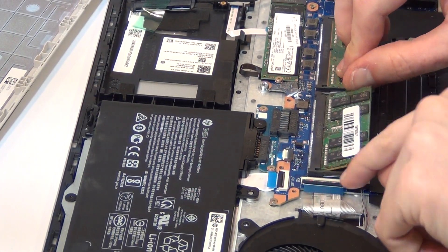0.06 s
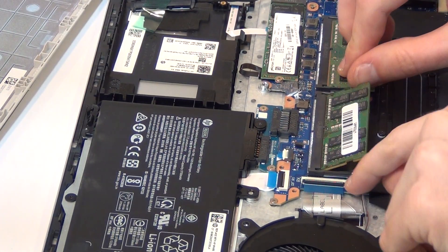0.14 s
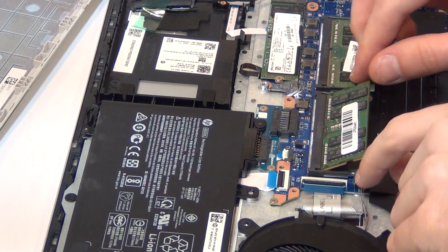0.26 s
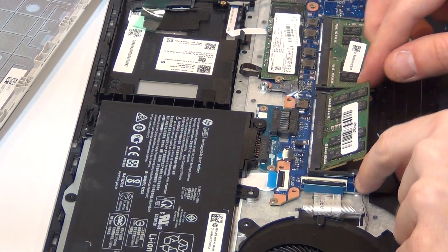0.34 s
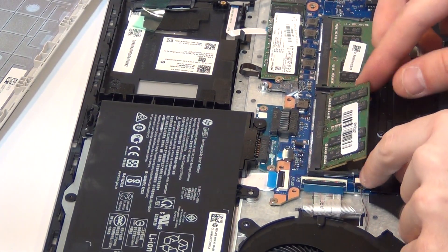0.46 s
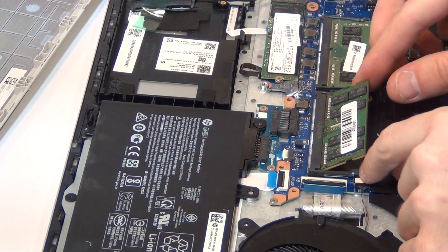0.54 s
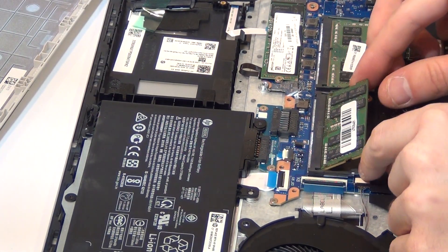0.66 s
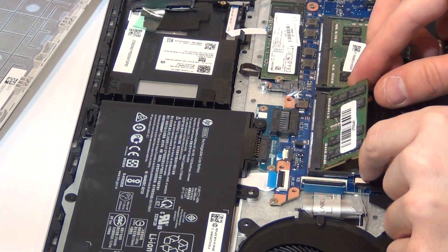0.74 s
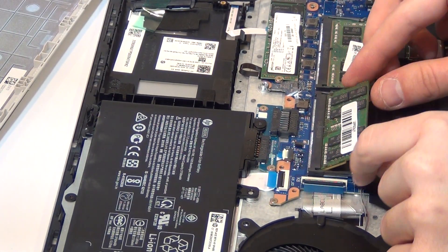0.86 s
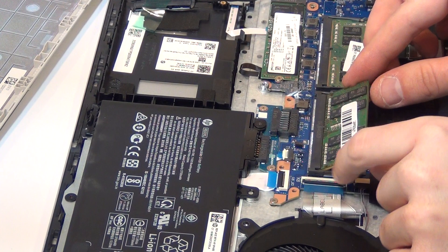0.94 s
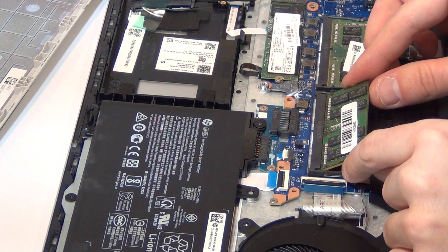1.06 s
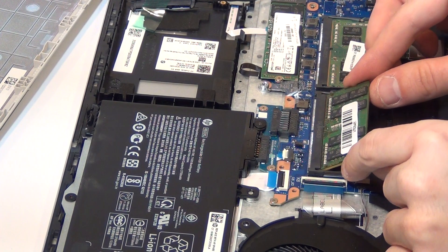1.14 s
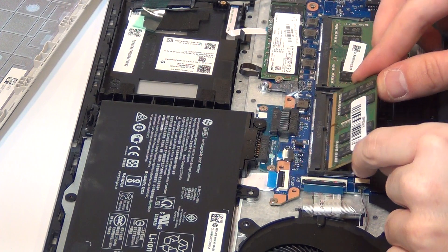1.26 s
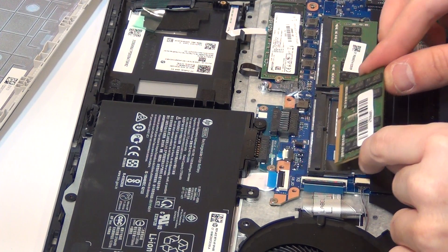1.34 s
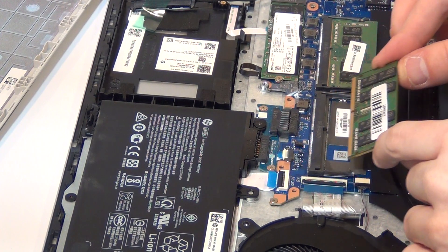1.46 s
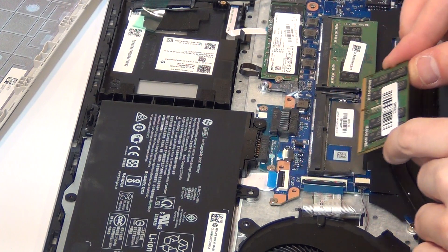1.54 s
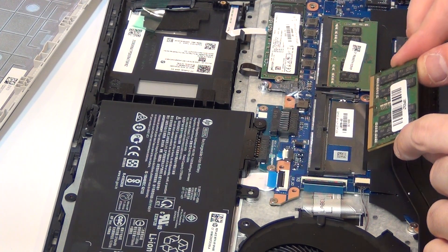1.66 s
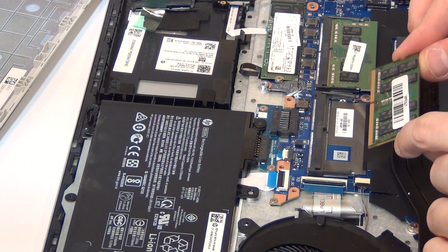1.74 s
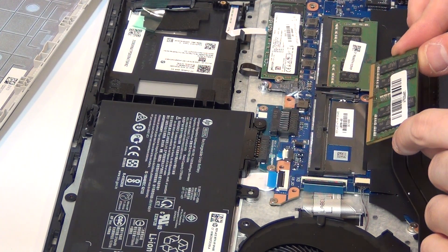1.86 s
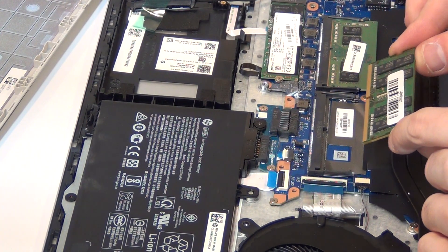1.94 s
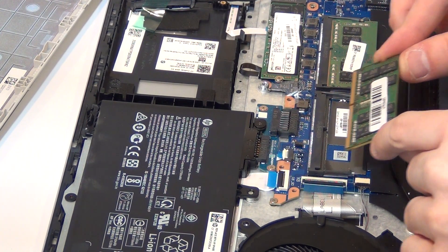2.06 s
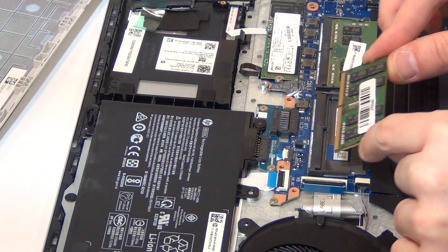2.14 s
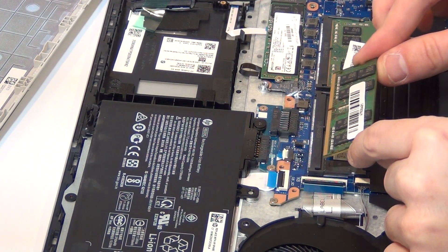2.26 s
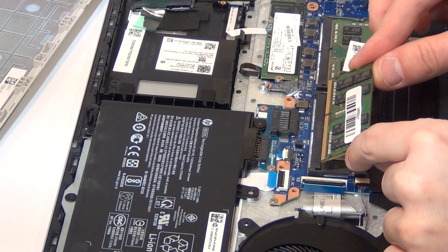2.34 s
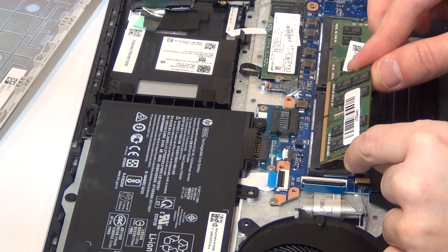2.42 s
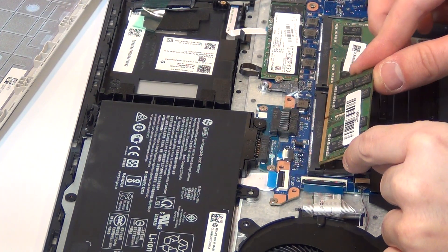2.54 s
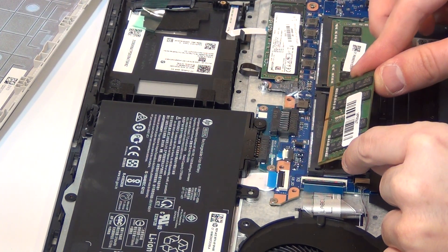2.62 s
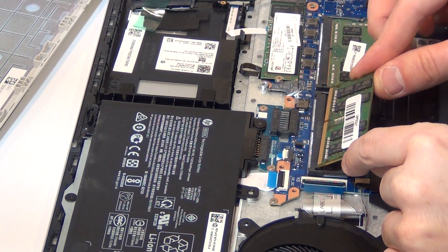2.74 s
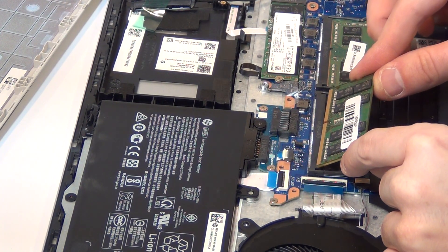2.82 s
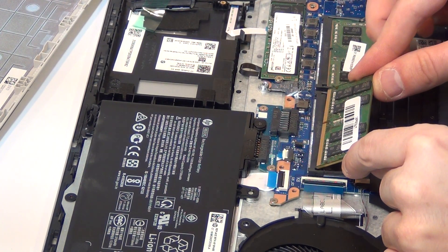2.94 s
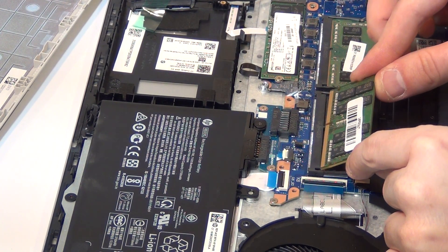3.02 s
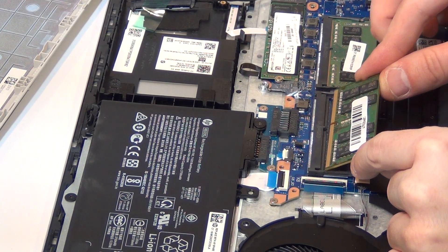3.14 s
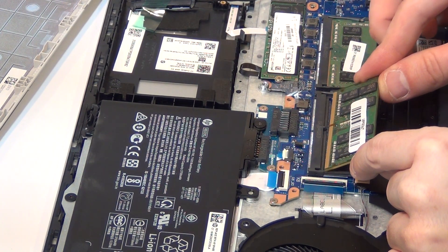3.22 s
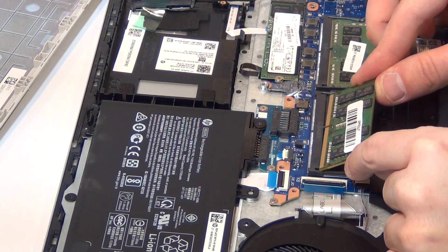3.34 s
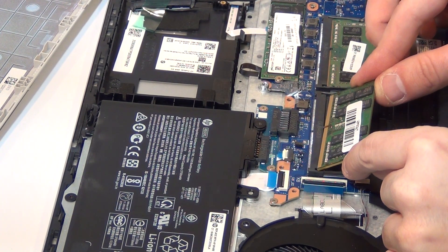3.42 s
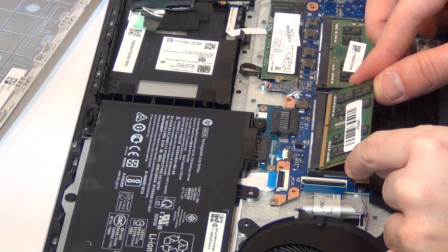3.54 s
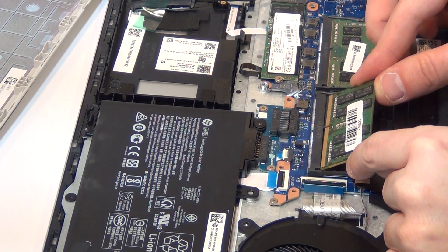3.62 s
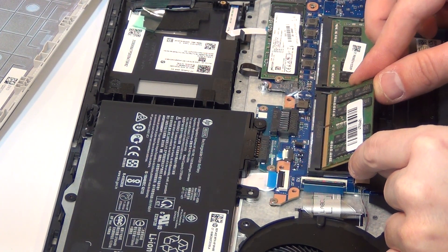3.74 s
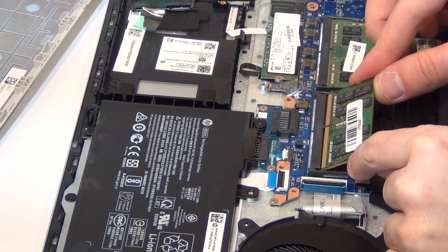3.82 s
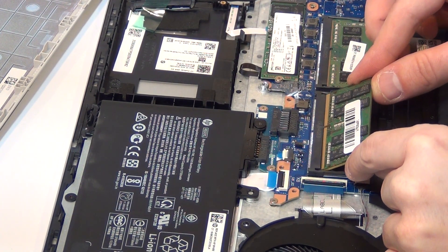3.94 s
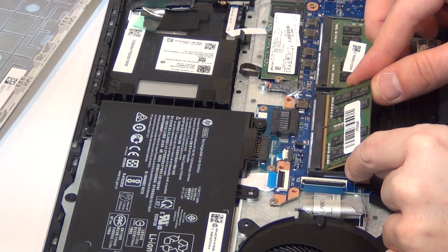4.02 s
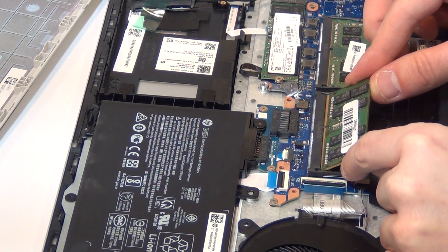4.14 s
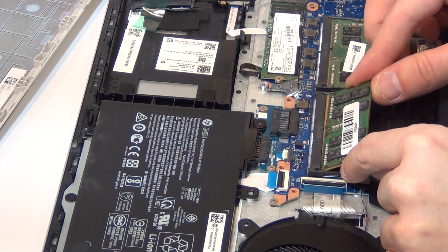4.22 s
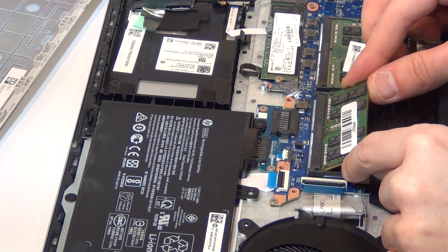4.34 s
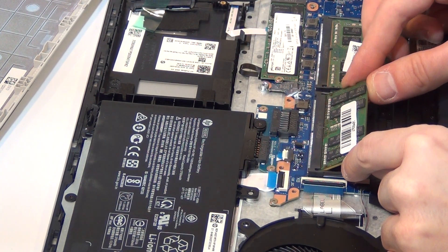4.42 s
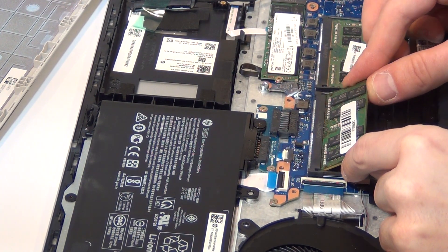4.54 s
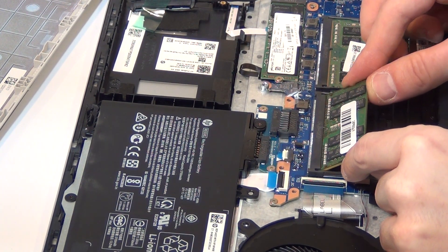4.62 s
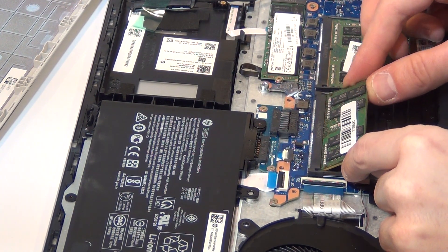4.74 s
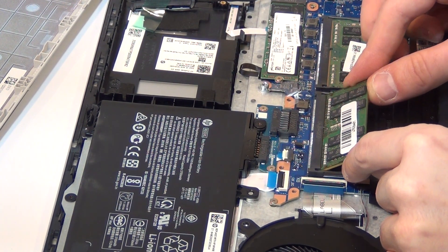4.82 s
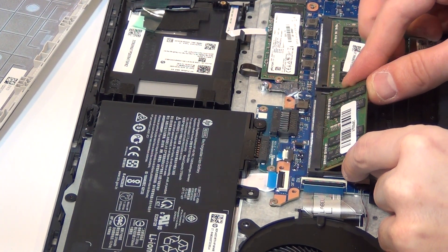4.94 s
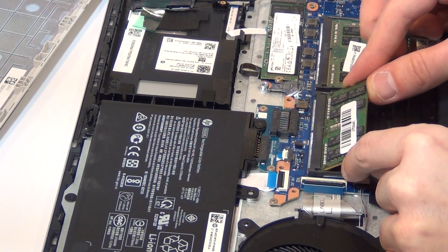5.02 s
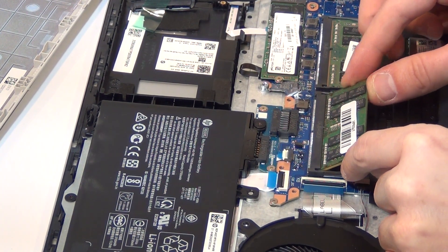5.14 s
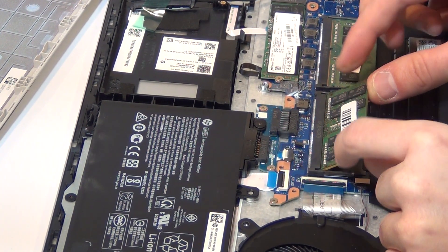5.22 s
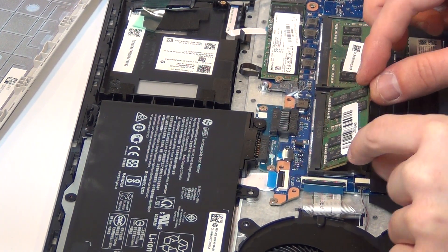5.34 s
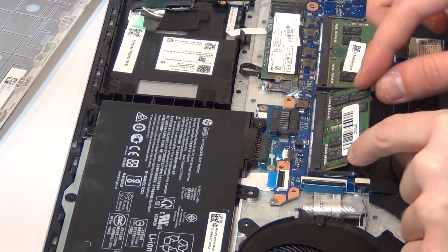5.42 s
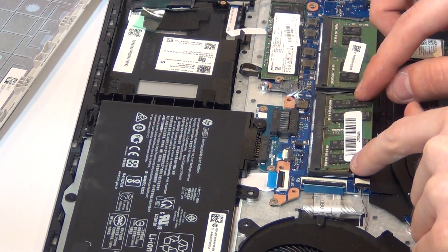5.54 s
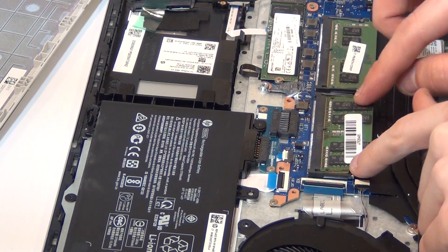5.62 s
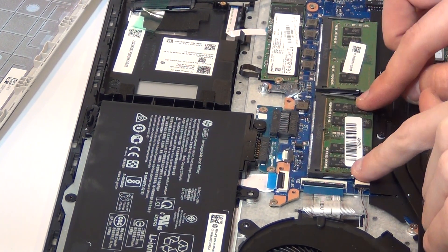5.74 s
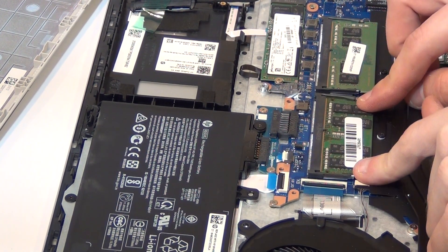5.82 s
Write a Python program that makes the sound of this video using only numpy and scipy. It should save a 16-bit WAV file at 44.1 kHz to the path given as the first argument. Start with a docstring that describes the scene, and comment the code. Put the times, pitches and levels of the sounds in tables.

```python
"""A small room, an open laptop: a memory module is fumbled into its slot. Enveloped noise scrapes, and narrow
noise bands give hoarse drag tones and a rattly wash after the second knock; struck modes tick against the
socket and seat with two knocks. Pressed flat, the module makes the latches creak in small slips, then two steel
latches snap over it. The shell rings and the room answers as fading noise. Low rumble, mains hum, microphone
hiss and a faint high whine lie beneath, all nearly mono."""
import sys
import numpy as np
from scipy import signal
from scipy.fft import rfft, irfft, next_fast_len
from scipy.io import wavfile
from scipy.ndimage import uniform_filter1d, map_coordinates

SR = 44100
rng = np.random.default_rng(int(sys.argv[2]) if len(sys.argv) > 2 else 0)


def unload_audio(sound):
    """Save the sound as a 16-bit wav file, at the path given as the first command line argument."""
    columns = np.transpose(np.atleast_2d(sound))
    # keep every value between -1 and 1, then stretch to whole-number steps
    steps = np.round(np.clip(columns, -1, 1) * 32767)
    wavfile.write(sys.argv[1], SR, steps.astype(np.int16))


N = 258867

# Steady rumble and air, relative density: f/Hz, level/dB per Hz
RUMBLE_SPECTRUM = [(5, -0.5), (14, 8.5), (35, -1), (45, -16), (56, 7.5), (68, 5), (82, -5.5), (120, -4),
                   (170, -8.5), (260, -35)]
AIR_SPECTRUM = [(100, -44), (180, -0.5), (250, 2.5), (390, -3.5), (700, -7), (1300, -10), (2200, -16.5),
                (3400, -18.5), (5500, -23), (7500, -23.5), (11000, -25.5), (14000, -40), (16000, -20.5)]
# Hum lines: f/Hz, rms level/dB
HUM_LINES = [(23.3, -37), (50, -43), (55.3, -58), (100, -55.5), (150, -68.5), (257, -66)]

# Fingers and board edge sliding: t/s, length/s, dull drag level/dB, bright scratch level/dB
RUBS = [(0, 0.013, -36.5, -33), (0, 0.045, -41, -48), (.17, 0.14, -55, -56), (.403, 0.054, -45, -59),
        (0.715, 0.43, -52, -61), (1.21, .048, -55, -44), (1.238, 0.046, -45.5, -57.5),
        (1.344, .31, -54.5, -57), (3.016, .11, -51, -64), (3.267, 0.45, -54.5, -72),
        (4.94, 0.12, -50.5, -68), (5.197, 0.054, -52, -57.5), (5.352, .085, -66, -59)]
# Friction colours, relative density: f/Hz, level/dB per Hz
DRAG_SPECTRUM = [(80, -3), (250, 11), (700, 4), (1300, 0), (2200, -13), (5000, -75)]
SCRATCH_SPECTRUM = [(600, -3), (2000, -5.5), (3500, 2.5), (7000, 4), (12000, 2), (16000, -5.5)]

# Module edge landing on the socket: t/s, chassis knock level/dB, tick level/dB, brightness/dB per octave
CONTACTS = [(0.0126, -49, -38.5, -2.5), (0.0166, -32, -36.5, -1), (0.1836, -48, -47.5, 7),
            (0.2277, -47, -57, 0), (0.4107, -32, -42, -0.5), (1.2033, -59, -47, 0), (1.2394, -47, -45.5, 1),
            (3.512, -42.5, -53.5, 5), (3.6698, -44, -68, 0), (3.921, -40, -55, 0), (4.134, -27, -32, -1.5),
            (4.2103, -25.5, -36, -5.5), (4.3418, -40.5, -44, -6), (5.577, -49, -52, 1),
            (5.601, -33, -41.5, 0), (5.6115, -39, -37, -3), (5.6355, -42, -49, 1)]
# Narrow noise bands: hoarse tones of the dragging board, and a rattly wash after the second knock: t/s,
# length/s, centre f/Hz, width/Hz, level/dB
HOARSE_BANDS = [(.03, 0.18, 930, 150, -56.5), (.17, 0.072, 1040, 200, -51.5), (0.222, 0.074, 6800, 700, -61),
                (4.212, 0.11, 3480, 1300, -57), (5.37, .05, 4700, 800, -59.5)]
# Board edge flicking a latch spring: t/s, level/dB
FLICKS = [(4.9221, -44.5), (5.6525, -43.5)]
# Parts of a flick, relative to its level: chassis level/dB, board level/dB, spring level/dB, crack level/dB
FLICK_MIX = (-4, -17, 1, -7)
# Parts of the first latch slip: chassis level/dB, board level/dB, spring level/dB, crack level/dB
FIRST_SLIP_LEVELS = (-39, -46.5, -43, -43)
# Latches springing shut: t/s, chassis level/dB, board level/dB, spring level/dB, crack level/dB,
# hardness/dB per octave
LATCHES = [(5.707, -10.5, -20.5, -16.5, -18, 7.5), (5.7108, -32, -21.5, -33, -22.5, 0)]

# Ringing modes of chassis, circuit board, steel springs and laptop shell: f/Hz, relative level/dB, t60/s
CHASSIS_MODES = [(118, -17.5, 0.15), (337, -6, 0.052), (500, -3, 0.014), (780, 6.5, 0.007),
                 (1050, 2, 0.0069), (1227, -4.5, 0.018), (1540, -10.5, 0.013)]
BOARD_MODES = [(1700, -6.5, 0.01), (2005, -5.5, 0.012), (2850, -2.5, 0.0085), (3255, 3.5, 0.0065),
               (4000, 2, 0.0027)]
SPRING_MODES = [(4570, -4.5, 0.0042), (5030, 0, 0.0063), (5770, 3, 0.003), (6720, 6, 0.0032),
                (7900, -5, 0.0026)]
SHELL_MODES = [(255, 6.5, 0.17), (537, -2, .35), (592, 1.5, 0.22), (800, -4, 0.3), (883, -6, 0.57),
               (923, -4.5, 0.41), (1058, -11, 0.43), (1225, -0.5, 0.29), (1394, -2, 0.21), (1470, 4, .1),
               (1766, -10, 0.3)]
# Dense ring of laptop and room after the snap, relative density: f/Hz, level/dB per Hz
CLATTER_SPECTRUM = [(50, -7), (120, 4.5), (200, 2.5), (270, -11), (380, -5.5), (550, 4.5), (900, -3),
                    (1400, -5), (2000, -9), (2600, -15.5), (4000, -14), (6200, -15), (8000, -19),
                    (12000, -16), (15500, -30)]

# Decay of the room: f/Hz, t60/s
ROOM_DECAY = [(100, 0.46), (500, 0.34), (1500, 0.43), (4000, 0.46), (7000, 0.45), (14000, 0.26)]
# Relative reflection from the walls: f/Hz, level/dB
WALL_COLOUR = [(50, 6), (130, 12), (330, 16.5), (900, 14), (1500, 9.5), (3300, 11), (6000, 7), (12000, 3.5),
               (15500, 0)]
# Pitches that stand for low chassis, high chassis, board, spring and crack: f/Hz
PART_HZ = [350, 1300, 2500, 6000, 10000]

STRIKE_SPREAD_DB = 1.2  # standard deviation of each mode's strength
CONTACT_S = .004  # opening stretch over which a part's level is set
# Brightness tilts a tick about TICK_HZ; the springs then sit below that tilt
TICK_HZ, SPRING_DB = 5160, -4.5
# A knock at FIRM_DB is neutral; each dB lighter tilts it up by this many dB per octave
FIRM_DB, HARDER_PER_DB = -30.5, .3
# Skid before a landing: length, level relative to its tick, and dB added per dB/octave of dullness
SKID_S, SKID_DB, SKID_PER_DULLNESS = .01, -21.5, 2.6
# Latch slips before the snap: start, spacing, and growth per slip
SLIP_START_S, SLIP_GAP_S, SLIP_GROWS_DB = 5.6875, .0047, 1
# Whine centre, standard deviation of its drift targets, and drift targets per second
WHINE_HZ, WANDER_HZ, WANDERS_PER_S = 15320, 70, 3
TOP_HZ = 15900  # upper band limit


def amp(db):
    """Turn decibels into gain."""
    return 10 ** (np.asarray(db) / 20)


def unit(x):
    """Scale a signal to rms 1."""
    return x / np.sqrt(np.mean(x ** 2) + 1e-20)


def along(points, hz):
    """Interpolate (Hz, value) points along a log frequency axis."""
    f, value = np.transpose(points)
    return np.interp(np.log(hz + 1), np.log(f + 1), value)


def filtered(x, response):
    """Shape a signal's spectrum with a gain response, zero-padded by at least half a second."""
    size = next_fast_len(N + SR // 2)
    spectrum = rfft(x, size) * response(np.fft.rfftfreq(size, 1 / SR))
    return irfft(spectrum, size)[..., :N]


def noise(spectrum):
    """Make coloured noise of rms 1."""
    return unit(filtered(rng.standard_normal(N), lambda hz: amp(along(spectrum, hz))))


def add(track, s, sound):
    """Mix a sound into a track at time s, trimmed at the track's end."""
    part = track[max(round(s * SR), 0):][:len(sound)]
    part += sound[:len(part)]


def swell(t, s, length):
    """One half-sine stroke: silent, swelling, fading, silent."""
    return np.sin(np.pi * np.clip((t - s) / length, 0, 1))


def tail(colour_db, near):
    """Diffuse coloured reverberation: near surfaces boost its start, then each frequency dies at its own speed."""
    hz, t, grid = signal.stft(rng.standard_normal(SR // 2), SR, nperseg=512)
    decay_db = -60 * t / along(ROOM_DECAY, hz)[:, None]
    fade = amp(colour_db(hz)[:, None] + decay_db)
    wash = signal.istft(grid * fade, SR, nperseg=512)[1]
    age = np.arange(len(wash)) / SR
    onset = 1 - np.exp(-age / 0.0021)
    return wash * onset * (1 + near * np.exp(-age / 0.011))


def ring(modes, t, tilt_db=0):
    """Damped modes of alternating sign, struck at slightly new strengths; tilt_db per octave hardens the blow."""
    hz, db, t60 = np.transpose(modes)[:, :, None]
    spread = STRIKE_SPREAD_DB * rng.standard_normal(db.shape)
    strength = db + tilt_db * np.log2(hz / hz[0]) + spread
    sign = (-1) ** np.arange(len(hz))[:, None]
    return np.sum(sign * amp(strength - 60 * t / t60) * np.sin(2 * np.pi * hz * t), axis=0)


def click(levels, hardness_db, chatter, chatter_t60, crack_t60):
    """A push rocks the chassis; impulse and brief chatter excite board and springs, with a noisy crack on top."""
    t = np.arange(SR // 8) / SR

    def burst(t60):
        return rng.standard_normal(len(t)) * amp(-60 * t / t60) * (1 - np.exp(-t / 0.00041))

    force = chatter * burst(chatter_t60)
    force[0] = 1
    knock = ring(CHASSIS_MODES, t, tilt_db=hardness_db)
    board = signal.fftconvolve(force, ring(BOARD_MODES, t))[:len(t)]
    spring = signal.fftconvolve(force, ring(SPRING_MODES, t))[:len(t)]
    treble = signal.butter(2, [7800, 13500], "band", fs=SR, output="sos")
    crack = signal.sosfilt(treble, burst(crack_t60))
    mix = np.zeros(len(t))
    for db, part in zip(levels, (knock, board, spring, crack)):
        opening = np.std(part[:round(CONTACT_S * SR)])
        mix += amp(db) * part / opening
    return mix


def touch(s, levels, hardness_db):
    """A track with one touch on it; the room answers in the touch's own colour."""
    track = np.zeros(N)
    knock, board, spring, crack = levels
    add(track, s, click(levels, hardness_db, chatter=0.28, chatter_t60=0.0069, crack_t60=0.013))
    # hardness thins the low end of the knock and lifts its top
    part_levels = (knock - hardness_db, knock + hardness_db, board, spring, crack)
    colour = list(zip(PART_HZ, part_levels))
    add(track, s, amp(-17) * tail(lambda hz: along(colour, hz) + along(WALL_COLOUR, hz), near=1.0))
    return track


def background():
    """Throbbing low rumble and airy hiss from coloured noise, with mains hum from steady sines."""
    t = np.arange(N) / SR
    hum = np.zeros(N)
    for hz, db in HUM_LINES:
        hum += amp(db) * np.sqrt(2) * np.sin(2 * np.pi * (hz * t + rng.random()))
    return hum + amp(-44) * noise(RUMBLE_SPECTRUM) + amp(-50.5) * noise(AIR_SPECTRUM)


def whine(jitter_hz, db):
    """A faint electronic sine whose pitch drifts slowly and jitters quickly (jitter_hz rms)."""
    place = np.arange(N) / SR * WANDERS_PER_S
    drift = WANDER_HZ * map_coordinates(rng.standard_normal(size=64), [place], mode="mirror")
    jitter = jitter_hz * unit(uniform_filter1d(rng.standard_normal(N), size=60))
    phase = 2 * np.pi * np.cumsum(WHINE_HZ + drift + jitter) / SR
    return amp(db) * unit(np.sin(phase))


def side_hiss():
    """A trace of coloured noise that sets the two microphones apart."""
    # f/Hz, relative level/dB per Hz
    spectrum = [(40, -1), (150, 8.0), (700, 2.0), (3000, -11), (8000, 7.0), (15000, 5)]
    return amp(-65.0) * noise(spectrum)


def fingers():
    """Friction noise swells and fades, roughened by tiny uneven slips; a glancing edge skids before it lands."""
    t = np.arange(N) / SR
    drag, scratch = np.zeros(N), np.zeros(N)
    for s, length, drag_db, scratch_db in RUBS:
        stroke = swell(t, s, length)
        drag += amp(drag_db) * stroke
        scratch += amp(scratch_db) * stroke
    for s, _, tick, brightness in CONTACTS:
        skid_db = tick + SKID_DB - SKID_PER_DULLNESS * brightness
        scratch += amp(skid_db) * swell(t, s - SKID_S, SKID_S)
    unevenness = unit(uniform_filter1d(rng.standard_normal(N), size=90))
    slips = unit(amp(2.5 * unevenness))
    rubbing = slips * (drag * noise(DRAG_SPECTRUM) + scratch * noise(SCRATCH_SPECTRUM))
    room = tail(np.zeros_like, near=0.6)
    reply = signal.fftconvolve(rubbing, room / np.linalg.norm(room))[:N]
    return rubbing + amp(-9) * reply


def module():
    """The edge ticks and knocks in the socket; light knocks sound higher, bright ticks favour crack over board."""
    track = np.zeros(N)
    octaves = np.log2(np.array(PART_HZ[2:]) / TICK_HZ)
    for s, knock, tick, brightness in CONTACTS:
        board, spring, crack = tick + brightness * octaves
        hardness_db = HARDER_PER_DB * (FIRM_DB - knock)
        track += touch(s, (knock, board, spring + SPRING_DB, crack), hardness_db)
    return track


def hoarse_bands():
    """Narrow bands of noise swell and fade: hoarse tones as the board drags, and a rattly wash after the second
    knock."""
    t, track = np.arange(N) / SR, np.zeros(N)
    for s, length, centre_hz, width_hz, db in HOARSE_BANDS:
        stroke = np.sqrt(np.abs(swell(t, s, length)))

        def resonance(hz):
            return 1 / (1 + (2 * (hz - centre_hz) / width_hz) ** 2)

        tone = filtered(rng.standard_normal(N), resonance)
        track += amp(db) * stroke * unit(tone)
    return track


def flicks():
    """A brushed latch spring gives a thin steel tick."""
    return sum(touch(s, db + np.array(FLICK_MIX), hardness_db=-7) for s, db in FLICKS)


def creak(count):
    """The latches stick and slip over the board's edge in a quick, growing run as they are forced apart."""
    track = np.zeros(N)
    for k in range(count):
        levels = np.array(FIRST_SLIP_LEVELS) + k * SLIP_GROWS_DB
        track += touch(SLIP_START_S + k * SLIP_GAP_S, levels, hardness_db=6)
    return track


def latches():
    """Both latches snap over the board; shell modes and a dense clatter ring on from the first snap."""
    track, t = np.zeros(N), np.arange(SR // 2) / SR
    for s, *levels, hardness in LATCHES:
        add(track, s, click(levels, hardness, chatter=0.82, chatter_t60=0.0052, crack_t60=.009))
    snap_s = LATCHES[0][0]
    add(track, snap_s, amp(-27.5) * ring(SHELL_MODES, t))
    add(track, snap_s, amp(-6.5) * tail(lambda hz: along(CLATTER_SPECTRUM, hz), near=0.19))
    return track


def scene():
    """Everything reaches both microphones alike; only a trace of hiss differs."""
    handling = module() + flicks() + fingers() + hoarse_bands()
    mid = handling + creak(count=4) + latches() + background() + whine(jitter_hz=129, db=-66.5)
    side = side_hiss()
    return np.array([mid + side, mid - side])


def record(dry):
    """The input saturates on loud peaks such as the snap, then a steep low-pass cuts above the band limit."""
    clipped = dry / (1 + np.abs(dry) ** 8) ** (1 / 8)
    return filtered(clipped, lambda hz: 1 / np.sqrt(1 + (hz / TOP_HZ) ** 160))


dry = scene()
out = record(dry)
unload_audio(out)
```